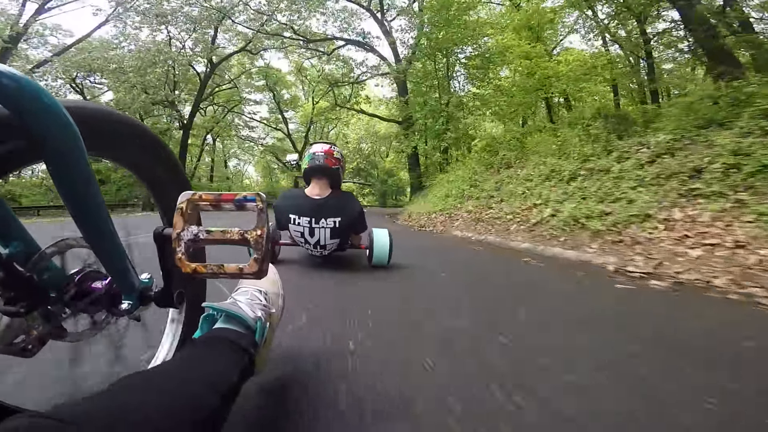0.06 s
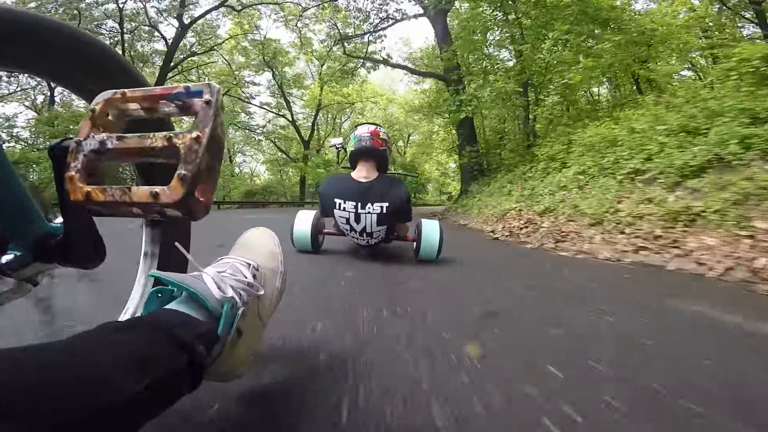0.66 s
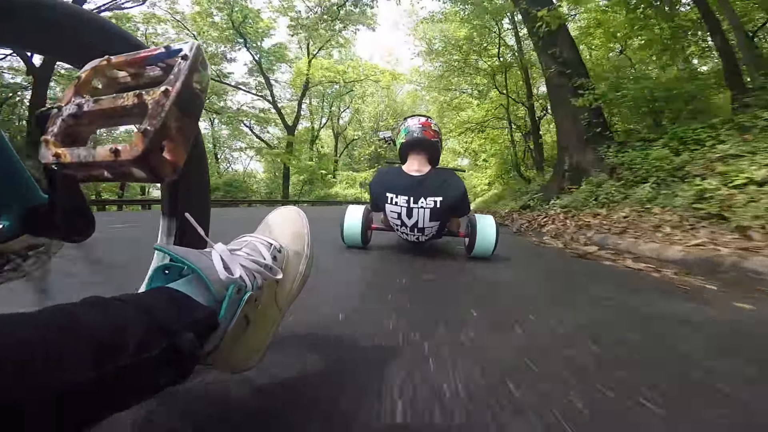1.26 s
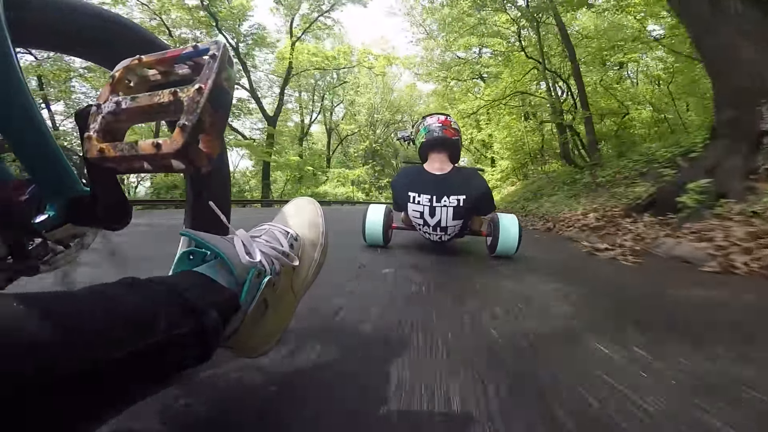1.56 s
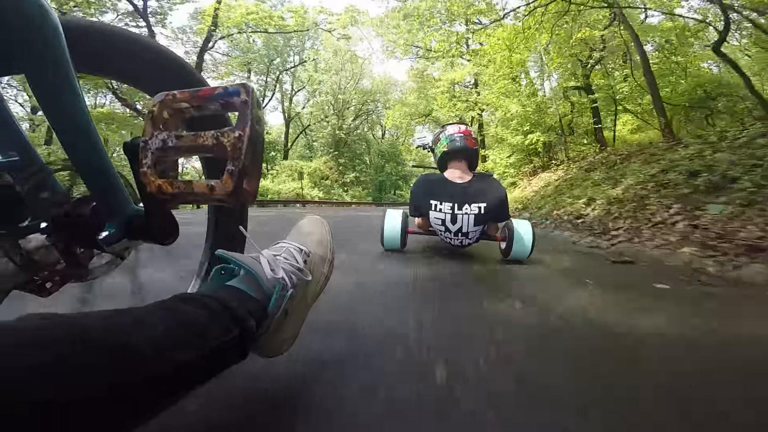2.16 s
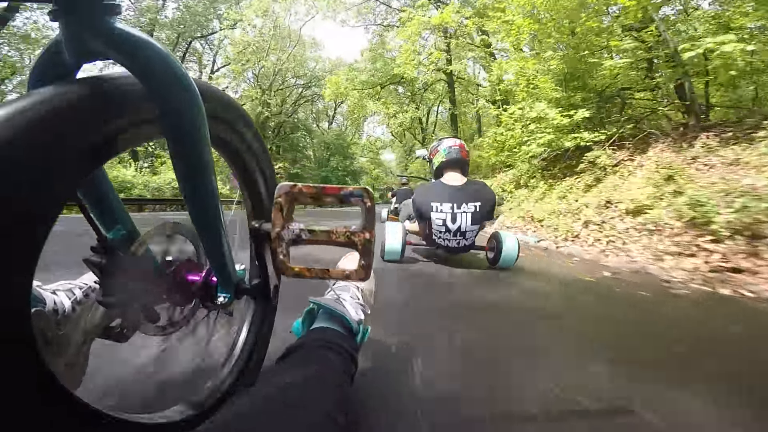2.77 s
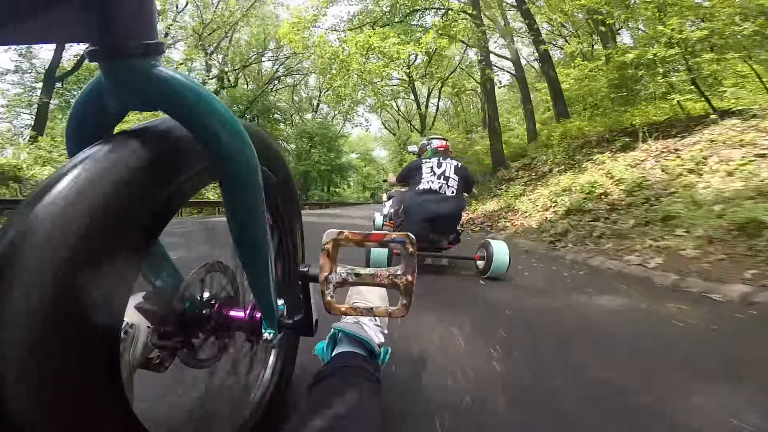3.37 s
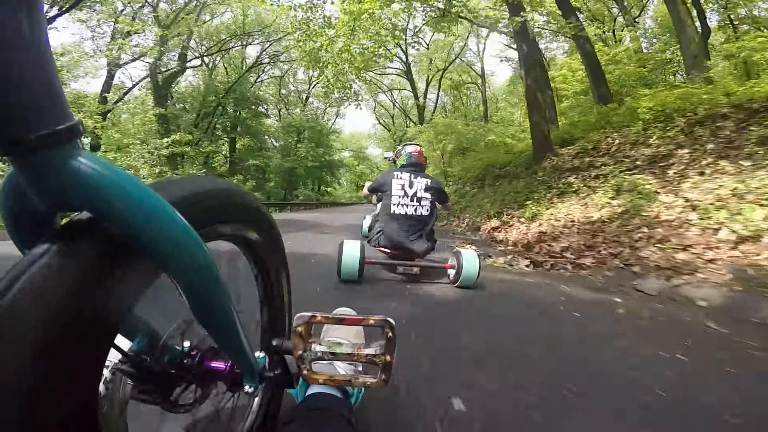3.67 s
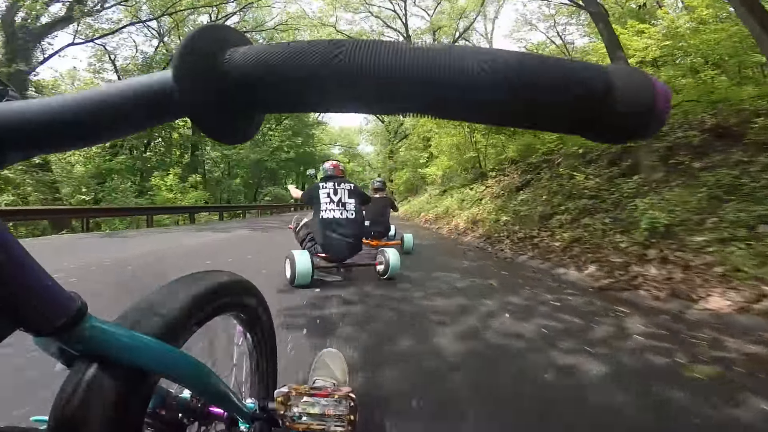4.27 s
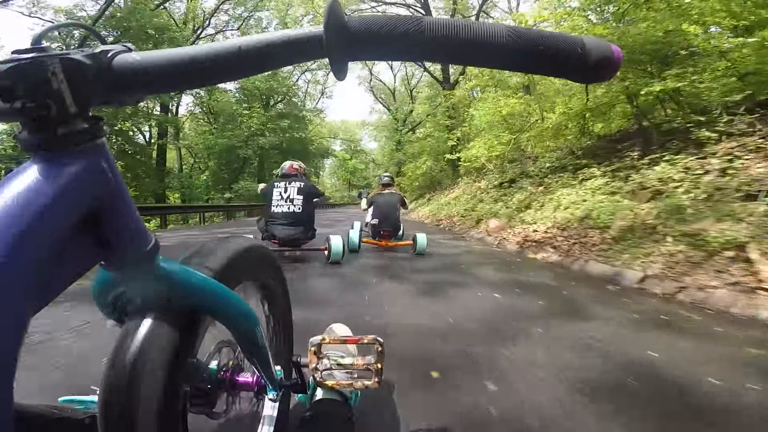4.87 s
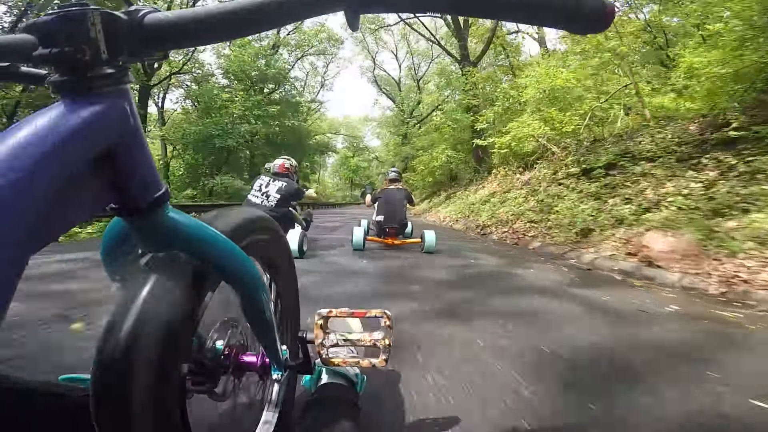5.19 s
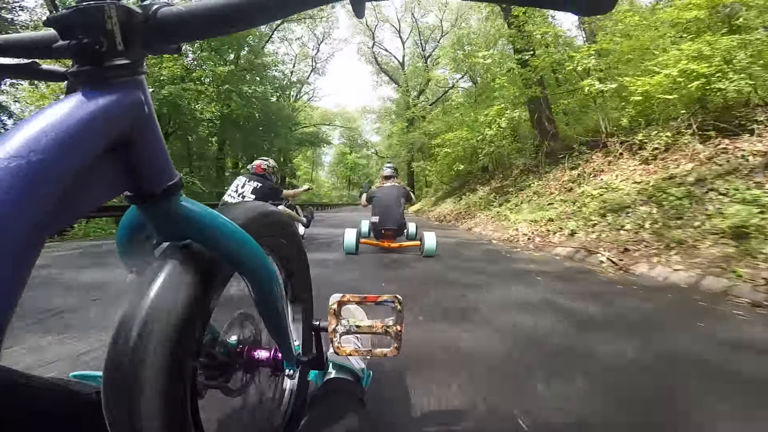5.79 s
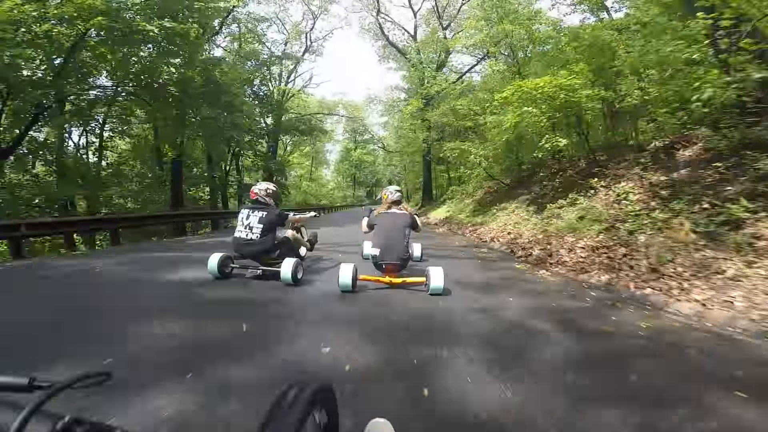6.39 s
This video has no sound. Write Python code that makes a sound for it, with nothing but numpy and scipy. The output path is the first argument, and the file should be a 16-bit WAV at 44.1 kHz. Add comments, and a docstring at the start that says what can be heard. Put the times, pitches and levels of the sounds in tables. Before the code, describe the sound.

A drift trike coasts down an asphalt road for about six and a half seconds, with the microphone travelling alongside the rider. From the start, hard plastic wheels make a bright, grainy scrubbing hiss with light drumming beneath, over a low, fluttering wind rumble. The slide is strongest around 1.3 to 2 seconds, eases from about 3 seconds and stays softer from 4 seconds on. The wind gusts right at the opening, again near 1.3 and 2 seconds, and grows heavier around 3 seconds. Short slaps of air thump the microphone, hardest near 3.5 seconds, then at 3.8, 4.3 and 5.9 seconds. Tiny sharp cracks of grit come now and then, including near 0.1, 0.4, 2.7, 3.6 and 5.9 seconds. A very faint, high freewheel buzz runs underneath, clearest around 1 second. Wind and wheels continue to the end.

```python
"""A thump of head wind and the hiss of plastic on asphalt: a drift trike coasts down a road.
Its hard rear wheels scrub and drum over the grain of the surface and now and then crack a piece of grit.
The freewheel of the front hub buzzes faintly as its pawls drop from tooth to tooth.
Turbulent air buffets the microphone, which travels with the rider."""
import sys
import numpy as np
from scipy import signal
from scipy.fft import rfft, irfft
from scipy.io import wavfile
from scipy.ndimage import uniform_filter1d, minimum_filter1d

SR = 44100
rng = np.random.default_rng(int(sys.argv[2]) if len(sys.argv) > 2 else 0)


def int16_out(signal):
    """Quantize to a 16-bit WAV file."""
    q = np.round(np.clip(np.atleast_2d(signal).T, -1, 1) * 32767)
    wavfile.write(sys.argv[1], SR, q.astype(np.int16))


N = 284004

# strength of the head wind: (time [s], relative flutter level [dB])
HEAD_WIND = [(0, -26), (0.6, -28), (2.7, -26), (2.92, -19), (3.5, -21.5), (4.1, -26.5), (4.6, -24),
             (5.1, -23), (6.44, -23.5)]
# gusts: (centre time [s], duration [s], flutter rise [dB])
GUSTS = [(0.035, 0.14, 11), (0.417, 0.048, 0), (0.79, 0.12, 5.5), (1.301, 0.061, 10.5), (1.461, 0.082, 8.5),
         (2.04, .225, 6.5), (2.851, 0.045, 5.5), (3.274, .042, 2.5), (3.41, 0.12, 5), (3.862, 0.16, 5),
         (4.231, 0.19, 6.5), (5.112, 0.073, 8), (5.369, 0.059, 4.5), (5.838, 0.11, 4), (6.296, 0.1, 6)]
# lulls, when the air briefly leaves the microphone: (centre time [s], duration [s], flutter drop [dB])
LULLS = [(0.175, 0.14, 7.5), (0.308, .08, 7.5), (1.61, 0.066, 5.5), (1.74, 0.046, 11), (3.967, 0.096, 8.5),
         (4.078, 0.043, 4), (4.445, .13, 7), (5.223, 0.07, 6)]
# hard slaps of air: (onset time [s], peak level [dB])
AIR_SLAPS = [(1.287, -14), (1.427, -15.5), (3.444, -7), (3.551, -7), (3.838, -12.5), (4.266, -9.5),
             (5.391, -27), (5.867, -15)]
# spectra of large eddies, small eddies and slaps: (frequency [Hz], relative spectral level [dB])
BUFFET_SPECTRUM = [(10, -32), (18, -7), (28, 1.5), (48, 1), (75, -3.5), (120, -8.5), (180, -20), (300, -36)]
FLUTTER_SPECTRUM = [(70, -31), (130, 3.5), (200, 1.5), (290, -5.5), (390, -13.5), (500, -24), (700, -28.5),
                    (1500, -45)]
SLAP_SPECTRUM = [(100, -3), (220, 0), (400, -8), (600, -24), (900, -29), (1600, -42)]
# road speed, as the ratchet counts it: (time [s], click rate [1/s])
CLICK_RATE = [(0, 156), (1.1, 162), (3.3, 165), (4.2, 153), (6.44, 151)]
# buzz of the front hub: (time [s], level [dB])
HUB_LEVEL = [(0, -65), (.6, -59), (1.1, -54), (2.1, -60.5), (3.3, -61.5), (4.7, -67), (5.2, -64),
             (6.05, -60), (6.44, -80)]
# modes of the steel pawls: (frequency [Hz], bandwidth per filter stage [Hz], relative level [dB])
PAWL_MODES = [(12480, 700, 0), (13150, 500, -10)]
# grit cracking under a wheel: (time [s], relative peak level [dB], centre frequency [Hz])
GRIT_CRACKS = [(0.0714, -22, 6740), (0.4085, -25.5, 7560), (0.993, -31, 7800), (2.691, -26, 7600),
               (3.6216, -27, 5900), (3.8777, -37, 7580), (4.8294, -41, 7960), (4.851, -32.5, 7760),
               (5.5907, -38, 7600), (5.876, -26, 7450)]
# sliding through the bend: (time [s], relative scrub level [dB], relative side-slip level [dB])
SLIDE_LEVELS = [(0, -21.5, -29), (0.3, -22.5, -31.5), (0.45, -21.5, -31.5), (1.35, -19, -27),
                (1.9, -20, -27.5), (2.35, -22.5, -29.5), (2.65, -20.3, -28.5), (2.86, -21, -29),
                (2.89, -25, -29.5), (3.33, -23, -30.5), (3.52, -26, -31.5), (3.58, -26.5, -35),
                (4.05, -30, -34.5), (4.9, -29.5, -37), (5.2, -31, -38.5), (5.9, -28, -34.5),
                (6.44, -29, -36.5)]
# short skids: (centre time [s], duration [s], side-slip rise [dB])
SKIDS = [(0.125, 0.0066, 5), (0.699, 0.011, 8), (1.538, .008, 3), (1.853, 0.027, 5.5), (2.104, .01, 5),
         (2.852, .03, 3)]
# road bumps that knock the wheel sleeves: (centre time [s], drumming rise [dB])
BUMPS = [(0.04, 8), (3.56, 4), (4.27, 9), (5.86, 8)]
# spectra of drumming, scrub and side slip: (frequency [Hz], relative spectral level [dB])
DRUM_SPECTRUM = [(300, -0.5), (480, -5), (700, -2), (900, -1), (1200, -17), (1600, -17), (2400, -31)]
SCRUB_SPECTRUM = [(900, -21.5), (1300, -7), (1800, -4), (2300, 0), (3000, 0.5), (3300, -0.5), (3800, -9),
                  (4800, -33.5)]
SLIP_SPECTRUM = [(2800, -2.5), (3900, 2), (4600, 2), (5200, 0.5), (5900, -2), (6700, -0.5), (7300, -9.5),
                 (8100, -13.5), (8900, -22), (10000, -33), (11200, -36.5), (13000, -26), (15200, -37.5)]
# narrow dips of the microphone's housing: (frequency [Hz], half-width [Hz], gain [dB])
HOUSING_DIPS = [(564, 40.6, -15.5), (1022, 19, -8.5), (1111, 33.6, -15.5)]


def from_db(db):
    """Amplitude grows tenfold for every 20 dB."""
    return 10 ** (np.asarray(db) / 20)


def unit_rms(x):
    """Division by the rms value gives unit power."""
    return x / np.sqrt(np.mean(x ** 2) + 1e-20)


def in_time(rows):
    """Linear interpolation gives each column of a curve at every sample."""
    times, *columns = np.transpose(rows)
    return [np.interp(np.arange(N) / SR, times, column) for column in columns]


def swells(rows, order):
    """Brief rises add in dB; a higher order gives flatter tops and steeper sides."""
    t = np.arange(N) / SR
    return sum(db * np.exp(-np.minimum(np.abs(2 * (t - centre) / length), 10) ** order)
               for centre, length, db in rows)


def drift(rate_hz):
    """Low-passed noise of unit rms wanders about rate_hz times a second."""
    step, settle = 40, 2000   # samples per point; points dropped while the filter settles
    pole = np.exp(-2 * np.pi * rate_hz * step / SR)
    noise = rng.standard_normal(N // step + settle + 2)
    slow = signal.lfilter([1], [1, -2 * pole, pole * pole], noise)[settle:]
    return np.interp(np.arange(N) / step, np.arange(len(slow)), unit_rms(slow))


def coloured(x, spectrum):
    """Source and filter: x is shaped by a spectrum falling 20 dB an octave past its ends; rms 1."""
    hz, db = np.transpose(spectrum)
    octave, points = np.log2(np.maximum(np.arange(N // 2 + 1) * SR / N, 1)), np.log2(hz)
    outside = np.abs(octave - np.clip(octave, points[0], points[-1]))
    gain = from_db(np.interp(octave, points, db) - 20 * outside)
    return unit_rms(irfft(rfft(x) * gain, N))


def resonance(x, hz, width_hz):
    """A damped two-pole resonator passes its natural frequency at unit gain."""
    r = np.exp(-np.pi * width_hz / SR)
    feedback = [1, -2 * r * np.cos(2 * np.pi * hz / SR), r * r]
    return signal.lfilter(np.array([1, 0, -1]) * (1 - r * r) / 2, feedback, x + 1e-18)


def steady_noise(spectrum, window_s):
    """Coloured noise divided by its running rms loses its slow swells."""
    noise = coloured(rng.standard_normal(N), spectrum)
    return noise / np.sqrt(uniform_filter1d(noise ** 2, int(window_s * SR)) + 1e-6)


def wind(buffet_db=-13.5, flutter_db=-24.5):
    """Turbulence: large eddies thump on the port; small ones shed at their crests and swell more."""
    airflow_db, = in_time(HEAD_WIND)
    airflow_db -= airflow_db.mean()
    gust_db, lull_db = swells(GUSTS, order=4), swells(LULLS, order=4)
    buffet_gain = from_db(buffet_db + 0.49 * airflow_db + 0.61 * gust_db - 0.68 * lull_db)
    flutter_gain = from_db(flutter_db + airflow_db + gust_db - lull_db)
    buffet = steady_noise(BUFFET_SPECTRUM, window_s=0.11)
    flutter = steady_noise(FLUTTER_SPECTRUM, window_s=0.089)
    bursts = unit_rms(from_db(1.8 * drift(rate_hz=30)) * (0.8 + np.abs(buffet)))
    eddies = from_db(2.16 * drift(rate_hz=14.7))   # each passing eddy lifts both together
    return eddies * (buffet_gain * buffet + flutter_gain * bursts * flutter)


def air_slaps(decay_s):
    """Pressure transients: a sharp gust hits the port, swells within milliseconds and dies away."""
    out, age = np.zeros(N), np.arange(SR // 10) / SR
    air = steady_noise(SLAP_SPECTRUM, window_s=0.029)
    for onset, db in AIR_SLAPS:
        span = slice(int(onset * SR), int(onset * SR) + len(age))
        slap = air[span] * age ** 2 * np.exp(-age / decay_s)
        out[span] += from_db(db) * slap / np.abs(slap).max()
    return out


def freewheel(teeth_passed, flam_s=0.00096):
    """Impact excitation: the steel pawls ring in their modes as they drop off each ratchet tooth."""
    hub_db, = in_time(HUB_LEVEL)
    drops = np.diff(np.floor(teeth_passed), prepend=0)
    # the pawls land a little apart, so each drop is a short uneven flam
    envelope = signal.lfilter([1], [1, -np.exp(-1 / (flam_s * SR))], drops + 1e-18)
    flams = envelope * rng.standard_normal(N)
    ping = sum(from_db(db) * resonance(resonance(flams, hz, width), hz, width)
               for hz, width, db in PAWL_MODES)
    return from_db(hub_db) * unit_rms(ping)


def grit(decay_s, width_hz, gain_db):
    """Brittle fracture: each crushed grain gives a bright crack a few milliseconds long."""
    out, age = np.zeros(N), np.arange(SR // 40) / SR
    for onset, db, hz in GRIT_CRACKS:
        burst = rng.standard_normal(len(age)) * np.exp(-age / decay_s)
        crack = resonance(burst, hz, width_hz)
        start = int(onset * SR)
        out[start:start + len(age)] += from_db(db + gain_db) * crack / np.abs(crack).max()
    return out


def worn_tread(turns, wobble_db, scuff_db):
    """Amplitude modulation: an out-of-round sleeve presses once a turn, and its scuffs add harmonics."""
    scuffs = sum(drift(rate_hz=0.38) * np.cos(2 * np.pi * (harmonic * turns + rng.random()))
                 for harmonic in range(2, 8))
    wobble = (1 + 0.3 * drift(rate_hz=0.7)) * np.cos(2 * np.pi * turns)
    return from_db(wobble_db * wobble + scuff_db * scuffs)


def asphalt(hits_per_s, spread_db, friction):
    """Shot noise: tiny impacts of uneven size on the stones of the road, over smooth friction noise."""
    sizes = from_db(spread_db * np.minimum(rng.exponential(1, N), 4)) * rng.choice([-1, 1], N)
    hits = rng.random(N) < hits_per_s / SR
    return unit_rms(sizes * hits) + friction * rng.standard_normal(N)


def wheels(turns, mean_drum_db=-38.5, scrub_gain_db=-0.02, slip_gain_db=1.45, bump_s=0.055):
    """Roughness excitation: the hollow sleeves drum, scrub near 3 kHz and hiss as they slip sideways."""
    scrub_db, slip_db = in_time(SLIDE_LEVELS)
    bump_db = swells([(centre, bump_s, db) for centre, db in BUMPS], order=2)
    drum_db = mean_drum_db + 1.15 * (scrub_db - scrub_db.mean()) + bump_db
    skid_db = swells(SKIDS, order=2)
    contact = worn_tread(turns, wobble_db=0.6, scuff_db=0.35) * from_db(0.45 * drift(rate_hz=40))
    chatter = worn_tread(turns, wobble_db=0.23, scuff_db=0.58) * from_db(0.5 * drift(rate_hz=21))
    drum_force = contact * asphalt(hits_per_s=1500, spread_db=2, friction=0.39)
    scrub_force = contact * asphalt(hits_per_s=6000, spread_db=3, friction=0.86)
    slip_force = contact * chatter * asphalt(hits_per_s=7000, spread_db=4.5, friction=0.74)
    drum = from_db(drum_db) * coloured(drum_force, DRUM_SPECTRUM)
    scrub = from_db(scrub_gain_db + scrub_db + 0.15 * skid_db) * coloured(scrub_force, SCRUB_SPECTRUM)
    slip = from_db(slip_gain_db + slip_db + skid_db) * coloured(slip_force, SLIP_SPECTRUM)
    return drum + scrub + slip


def scene():
    """Superposition: trike and wind add at the microphone; road speed drives wheels and ratchet alike."""
    clicks_per_s, = in_time(CLICK_RATE)
    teeth_passed = np.cumsum(clicks_per_s) / SR
    turns = teeth_passed / 12.4   # pawl clicks per turn of a rear wheel
    trike = wheels(turns) + freewheel(teeth_passed) + grit(decay_s=0.0019, width_hz=490, gain_db=5.0)
    return (trike + wind() + air_slaps(decay_s=0.003))[None]


def limiter(x, ceiling_db, release_db_per_s):
    """Look-ahead limiting: gain drops just before each peak above the ceiling and then recovers."""
    excess_db = np.maximum(20 * np.log10(np.abs(x[0]) + 1e-9) - ceiling_db, 0)
    release_db = release_db_per_s * np.arange(N) / SR
    held_db = np.maximum.accumulate(excess_db + release_db) - release_db
    return x * from_db(uniform_filter1d(minimum_filter1d(-held_db, size=129), size=129))


def record(dry, cutoff_hz=15250):
    """Filtering and limiting: the housing notches the spectrum, peaks are held down, the top is cut."""
    hz = np.arange(N // 2 + 1) * SR / N
    dips_db = sum(db * np.exp(-((hz - centre) / width) ** 2) for centre, width, db in HOUSING_DIPS)
    edge_fades = signal.windows.tukey(N, 300 / N)
    housed = irfft(rfft(dry) * from_db(dips_db), N) * edge_fades
    limited = limiter(housed, ceiling_db=-0.6, release_db_per_s=700)
    return signal.sosfilt(signal.ellip(10, 0.1, 90, cutoff_hz, fs=SR, output="sos"), limited)


dry = scene()
out = record(dry)
int16_out(out)
```